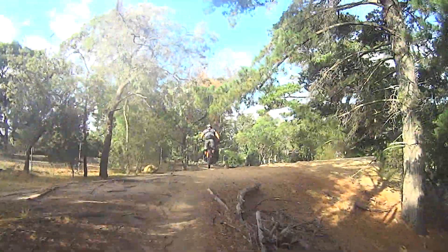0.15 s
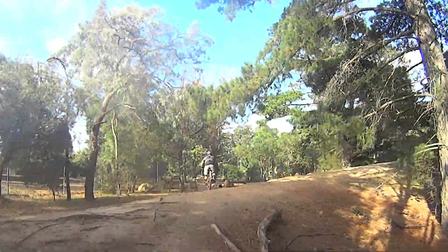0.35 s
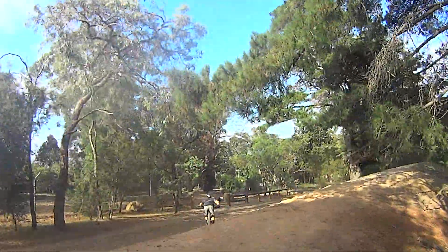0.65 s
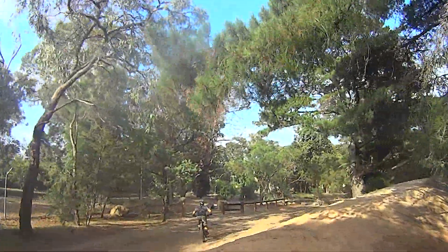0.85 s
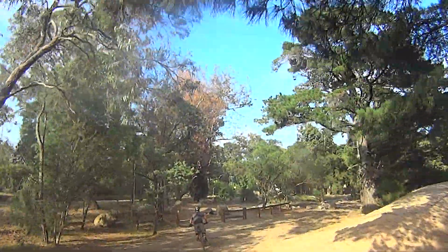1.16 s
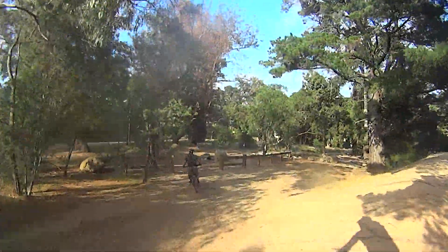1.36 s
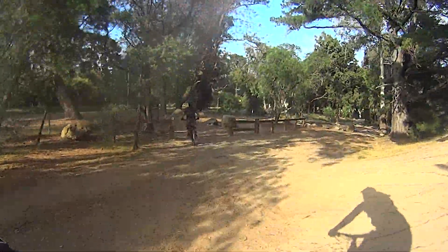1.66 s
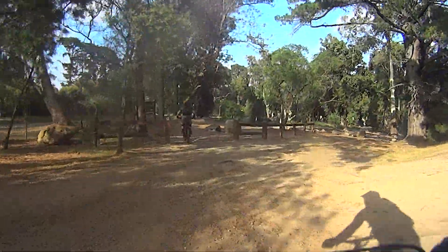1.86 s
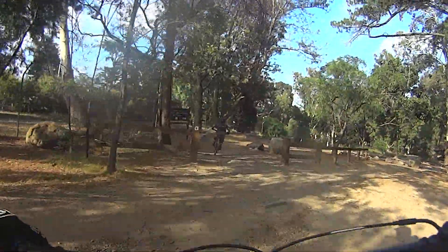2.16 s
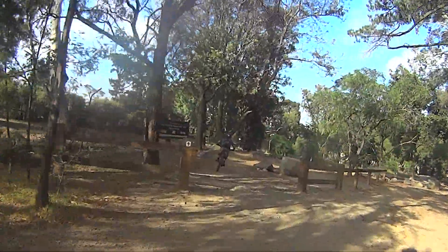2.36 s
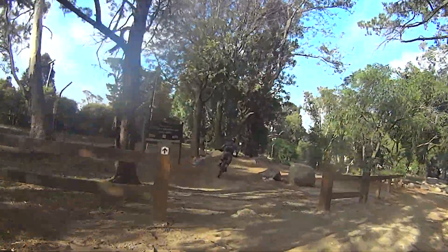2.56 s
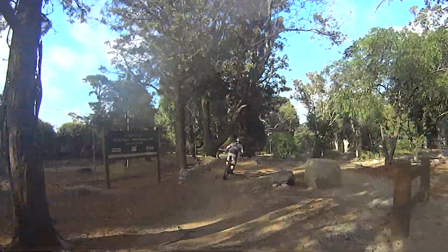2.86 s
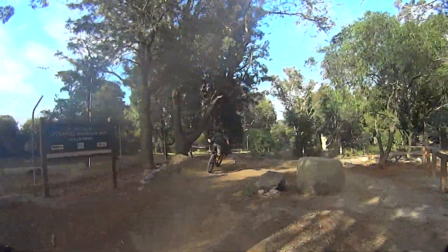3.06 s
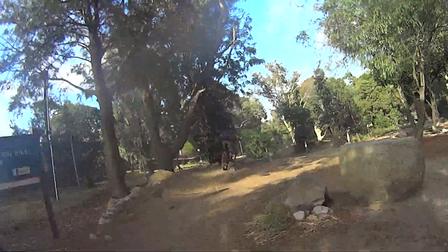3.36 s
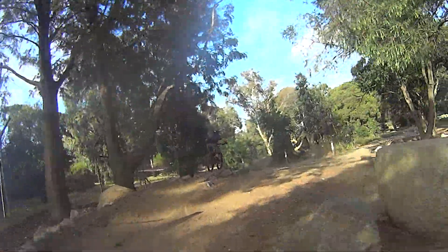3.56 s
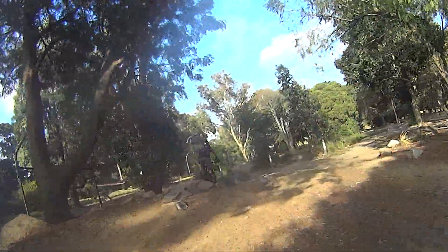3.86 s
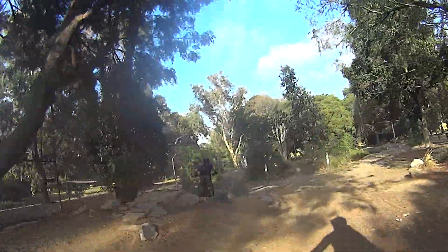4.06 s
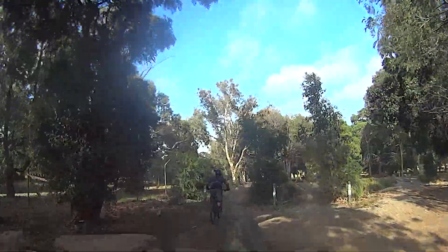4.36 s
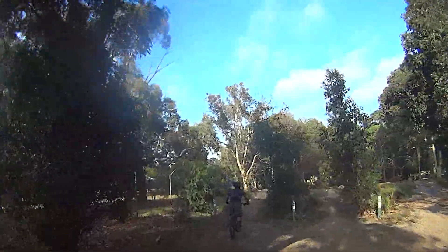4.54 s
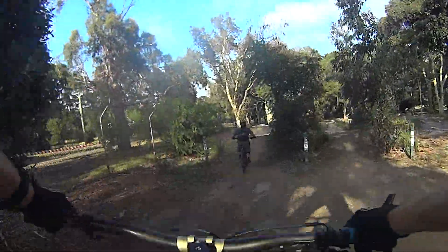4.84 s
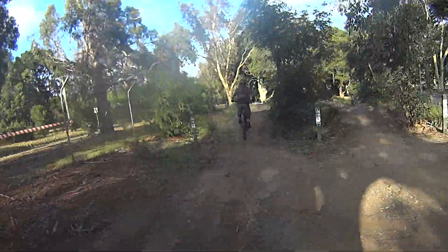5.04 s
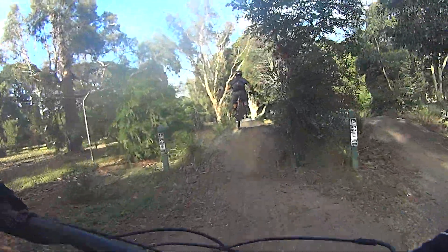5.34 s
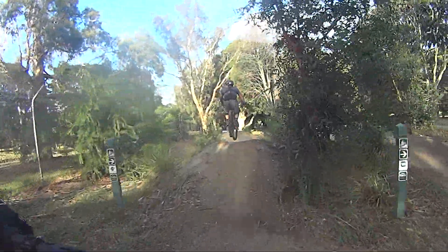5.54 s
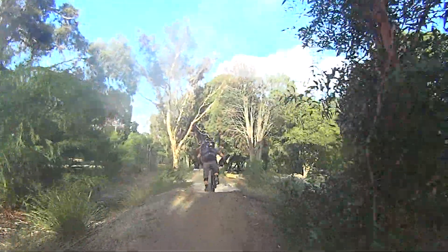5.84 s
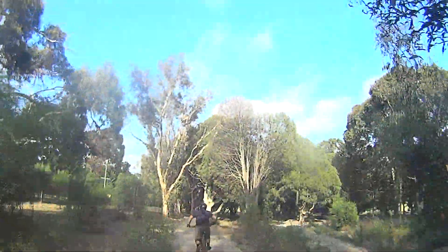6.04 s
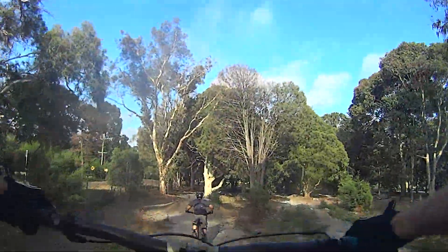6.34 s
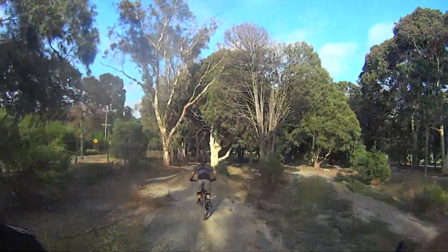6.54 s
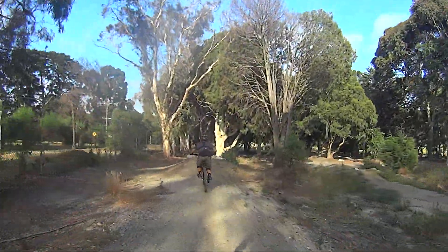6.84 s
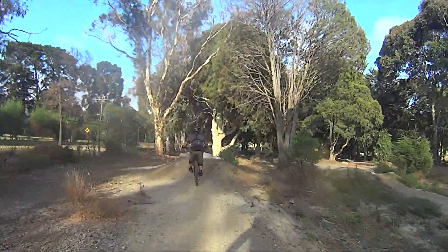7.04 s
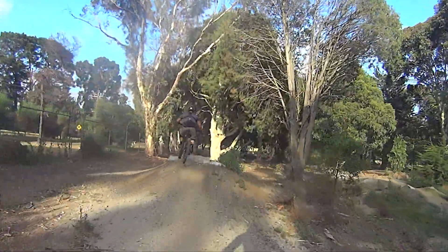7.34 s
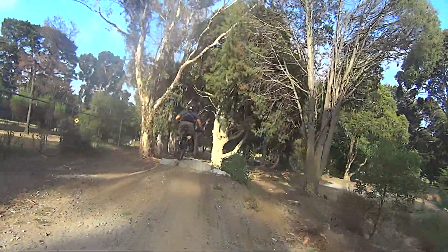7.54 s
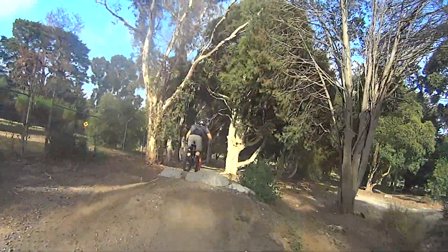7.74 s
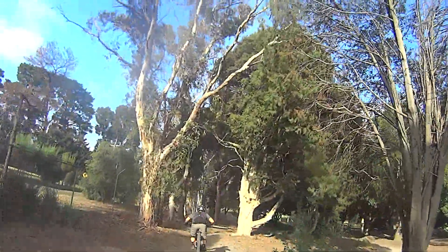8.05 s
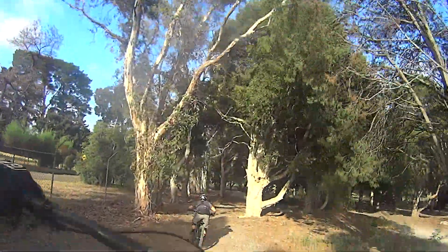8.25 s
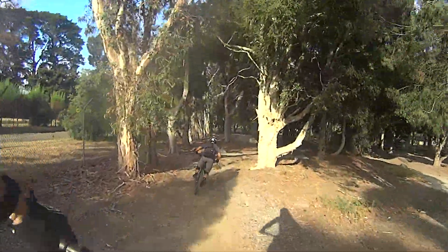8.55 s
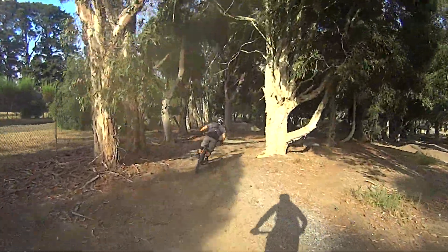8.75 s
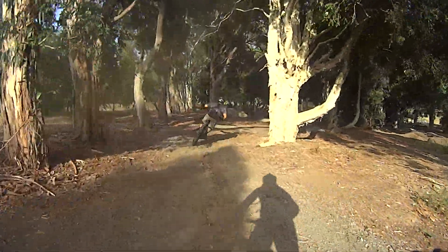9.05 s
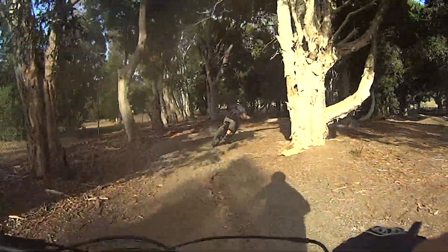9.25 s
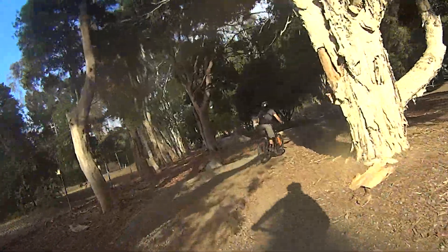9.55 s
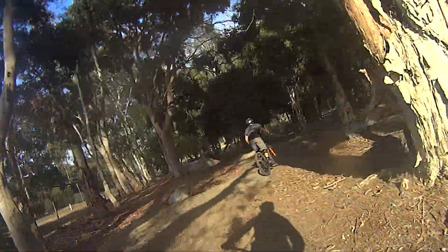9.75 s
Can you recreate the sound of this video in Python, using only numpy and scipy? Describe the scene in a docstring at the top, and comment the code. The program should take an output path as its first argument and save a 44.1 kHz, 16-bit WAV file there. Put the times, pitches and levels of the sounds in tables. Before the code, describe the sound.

A camera in a plastic case on the rider's chest hears a mountain bike coasting outdoors on dirt. Gravel crunches, tyres rumble and the hub buzzes steadily. Jumps briefly thin the sound before landings bring back the grit. A violent clanging hit comes at about three and a half seconds, with slaps and knocks around five and a dense rattle near seven.

```python
"""The tyres of a mountain bike coasting fast down a dirt trail, heard from a camera in a plastic case on the rider's chest.
They crunch and rumble as filtered random impacts, and grit sprays off them in short swells.
Chatter keeps the case resonating; bumps knock it on its mount, exciting damped modes of vibration.
Chain and cables slap in noise bursts, frame tubes clang in modes, pawl clicks ring the hub, wind buffets as low noise.
Over the jumps the tyres fall quiet, leaving a softer hub and wind."""
import sys
import numpy as np
from scipy import signal
from scipy.fft import rfft, irfft, next_fast_len
from scipy.io import wavfile
from scipy.ndimage import uniform_filter1d, map_coordinates

SR = 44100
rng = np.random.default_rng(int(sys.argv[2]) if len(sys.argv) > 2 else 0)


def master(y):
    """Save y as 16-bit WAV."""
    cut = np.clip(np.atleast_2d(y).T, -1, 1)
    pcm = np.round(cut * 32767)  # scale
    wavfile.write(sys.argv[1], SR, pcm.astype(np.int16))


N = 436590
TIME = np.arange(N) / SR   # s

# bumps that knock the camera on its mount: (time [s], relative level [dB], contact time [ms])
KNOCK_EVENTS = [(0.047, -14.5, 0.25), (0.112, -14, 0.36), (0.182, -19.5, 0.17), (.326, -15.5, 0.17),
                (0.403, -14.5, 0.34), (.459, -16.5, 0.2), (0.767, -17, 0.15), (.883, -19, 0.24),
                (0.941, -13, 0.34), (1.001, -7, 0.15), (1.091, -5.5, 1.45), (1.145, -25, 0.46),
                (1.161, -18.5, 0.5), (1.301, -19, 0.12), (1.327, -22.5, 0.15), (1.376, -24, 0.89),
                (1.441, -16, 0.089), (1.786, -18, 0.22), (1.828, -21, 0.21), (2.054, -15.5, 0.5),
                (2.645, -14.5, 0.24), (2.806, -8, 0.14), (3.052, -15.5, 0.2), (3.195, -19, 0.32),
                (3.266, -18, 0.65), (3.276, -9.5, 0.21), (3.345, -8.5, 0.19), (3.41, -10, 1.5),
                (3.418, -8, 0.44), (3.427, -9, 1.76), (3.44, -21, 0.1), (3.448, -18, 0.072),
                (3.495, -12.5, 0.48), (3.51, -8.5, 0.27), (3.948, -20, 0.17), (4.595, -20, 0.34),
                (4.624, -22.5, 0.95), (4.722, -21, 0.082), (5.047, -11.5, 0.044), (5.077, -18.5, 0.17),
                (5.102, -12.5, 0.2), (5.195, -12, 0.16), (5.226, -8.5, 0.3), (5.235, -7.5, 0.57),
                (5.316, -14, 0.22), (5.522, -23, 0.2), (6.072, -11.5, 0.24), (6.204, -19, 0.16),
                (6.799, -7.5, 0.19), (7.199, -18, 0.22), (7.305, -24.5, .35), (8.162, -22, 0.12),
                (8.22, -13.5, 0.35), (8.295, -24.5, .5), (8.325, -18.5, 0.27), (8.889, -15, 0.25),
                (8.953, -11.5, 0.34), (8.961, -8.5, 0.2), (8.965, -14, 0.25), (9.311, -16.5, 0.26),
                (9.449, -20.5, 0.42), (9.455, -10.5, 0.28), (9.535, -20, 0.12), (9.682, -18.5, 0.34)]
# sharp jolts that set the case ringing: (time [s], relative level [dB])
JOLT_EVENTS = [(1.2355, -23), (1.4402, -26), (1.7716, -23), (2.126, -14), (2.2356, -14), (2.8705, -10),
               (3.274, -19), (3.3021, -9), (3.4418, -6.5), (3.6456, -13), (3.7604, -14.5), (3.9213, -16),
               (4.658, -16), (4.831, -17), (4.895, -20), (4.934, -14.5), (5.0984, -11.5), (5.1749, -11.5),
               (5.7608, -14), (5.7905, -13), (6.757, -9), (6.7876, -10), (6.8167, -9.5), (6.877, -6.5),
               (6.898, -3.5), (6.9216, -12), (6.946, -10), (7.015, -8.5), (7.194, -15), (7.246, -10.5),
               (7.2768, -12), (7.442, -14.5), (7.661, -8), (8.7144, -19), (8.736, -14.5), (9.018, -13),
               (9.0964, -16), (9.388, -15.5)]
# spectrum of loose grit and sand: (frequency [Hz], relative level [dB])
GRIT_SPECTRUM = [(1000, 11.5), (2500, 1.5), (4000, 4.5), (5200, 6), (6500, 2.5), (8500, -2), (11000, -11)]

CASE_HZ, CASE_WIDTH_HZ, CASE_SKIRT_HZ = 1630.3, 136, 375   # resonance, its bandwidth, a wider second one


def from_db(db):
    """Amplitude gain from the logarithmic decibel scale."""
    return 10 ** (np.asarray(db) / 20)


def rms_one(x):
    """Normalise the mean power, so that the rms is 1."""
    return x / np.sqrt(np.mean(x ** 2) + 1e-20)


def in_time(rows):
    """Linear interpolation of each column of a time table at every sample."""
    seconds, *columns = np.transpose(rows)
    return [np.interp(TIME, seconds, column) for column in columns]


def at_hz(points, hz):
    """Interpolation of a spectrum along a logarithmic frequency axis."""
    frequency, value = np.transpose(points)
    return np.interp(np.log(hz + 1), np.log(frequency), value)


def pan(db):
    """Interaural level difference: left and right gains, db apart."""
    return from_db(np.array([[db], [-db]]) / 2)


def add(out, s, sound):
    """Linear superposition of a short sound from time s on."""
    start = int(np.clip(round(s * SR), 0, N - 1))
    out[..., start:start + sound.shape[-1]] += sound[..., :N - start]


def drift(rate):
    """Band-limited random fluctuation: Gaussian knots, rate per second, joined smoothly to rms 1."""
    knots = rng.standard_normal(4000)
    # every 20th sample is computed and held
    curve = map_coordinates(knots, [TIME[::20] * rate], order=2, mode="wrap")
    return rms_one(curve).repeat(20)[:N]


def resonate(x, hz, width_hz):
    """Damped resonance: a two-pole filter with gain about 1 at its peak."""
    radius = np.exp(-np.pi * width_hz / SR)
    zeros = np.array([1, 0, -1]) * (1 - radius * radius) / 2
    poles = [1, -2 * radius * np.cos(2 * np.pi * hz / SR), radius * radius]
    return signal.lfilter(zeros, poles, x + 1e-18)


def at_ports(pair, spectrum):
    """Partial coherence: two unrelated signals, coloured, mix into left and right; their middle has rms 1."""
    # likeness of the two microphone ports: (frequency [Hz], correlation [-1 to 1])
    likeness = [(60, 1), (130, 0.81), (200, 0.97), (290, -0.52), (450, 0.044), (650, -0.043), (900, -0.35),
                (1400, 0.13), (2500, 0.37), (3200, 0.27), (4000, -0.55), (5200, 0.94), (7000, 0.22),
                (11000, 0.39)]
    size = next_fast_len(N + 4096)
    hz = np.arange(size // 2 + 1) * SR / size
    alike = np.clip(at_hz(likeness, hz), -.98, .98)
    # like parts feed the middle, unlike parts the side
    balance = np.sqrt([1 + alike, 1 - alike])
    coloured = rfft(pair, size) * from_db(at_hz(spectrum, hz)) * balance
    mid, side = irfft(coloured, size)[:, :N]
    return np.array([mid + side, mid - side]) / np.std(mid)


def grains(per_s, spread_db, bed):
    """Shot noise: random cracks of unequal size over a noise bed; two rows share the instants."""
    struck = rng.random(N) < per_s / SR
    sizes = from_db(spread_db * np.minimum(rng.exponential(1, N), 4)) * struck
    cracks = rms_one(sizes * rng.standard_normal((2, N)))
    return cracks + bed * rng.standard_normal((2, N))


def steady(x, seconds):
    """Automatic gain: divide by the short-term rms, keeping the fine grain."""
    power = np.mean(np.atleast_2d(x) ** 2, axis=0)
    return x / np.sqrt(uniform_filter1d(power, int(seconds * SR)) + 1e-12)


def die_away(clicks, fade_s):
    """Exponential decay: each click falls by the factor e in fade_s."""
    return signal.lfilter([1], [1, -np.exp(-1 / (fade_s * SR))], clicks + 1e-18)


def case(force):
    """Cavity-like ring of the camera case: two cascaded resonances at one frequency."""
    return resonate(resonate(force, CASE_HZ, CASE_WIDTH_HZ), CASE_HZ, CASE_SKIRT_HZ)


def aftermath(hits, fade_s):
    """Incoherent addition: hits (time, dB, ..) leave decaying shaking, summed in power, as a gain."""
    power = np.zeros(N)
    for s, db, *_ in hits:
        add(power, s, from_db([db]) ** 2)
    # power fades twice as fast as amplitude
    return np.sqrt(die_away(power, fade_s / 2))


def shaken(level_db, shake):
    """Energy summation of a level in dB with an extra shaking gain."""
    return 20 * np.log10(np.hypot(from_db(level_db), shake))


def jumps():
    """Contact load: how far the tyres are unloaded (0-1), and the landing load in dB, which decays."""
    # jumps: (touch-down [s], time since take-off [s], time to unload tyres [s], extra load on landing [dB])
    flights = [(1.72, .47, .08, 5), (5.06, .14, 0.079, 12.5), (6.75, .62, .28, 2.5),
               (8.712, 0.56, .25, 3.5)]
    bite_s, settle_s = 0.014, 0.21   # the tyres bite into the dirt, then the suspension takes up the landing
    air, load_db = np.zeros(N), np.zeros(N)
    for touch_down, flight_s, unload_s, landing_db in flights:
        since = TIME - touch_down
        bite = np.clip(since / bite_s, 0, 1)
        air += np.clip((since + flight_s) / unload_s, 0, 1) * (1 - bite)
        load_db += landing_db * bite * np.exp(-np.maximum(since, 0) / settle_s)
    return np.clip(air, 0, 1), load_db


def ride(air, load_db):
    """Contact excitation: trail, flight, landings and bumps set the ring, crunch, rumble and drum levels."""
    # work of the tyres on the ground: (time [s], relative case ring level [dB], relative crunch level [dB])
    tyre_work = [(0.0, -33, -44.5), (0.88, -39.5, -47), (1.17, -35, -45), (1.9, -32, -41),
                 (2.05, -33.5, -42), (2.46, -26, -38), (2.8, -36.5, -43), (3.3, -32.5, -40.5),
                 (3.55, -36.5, -47), (3.75, -32, -42.5), (4.45, -34, -45.5), (4.75, -41, -46.5),
                 (5.45, -35.5, -49), (5.8, -32.5, -43), (7.05, -29.5, -40), (7.76, -35.5, -43.5),
                 (8.02, -26, -41.5), (8.25, -38.5, -38.5), (8.95, -35.5, -45.5), (9.15, -34, -40),
                 (9.45, -36, -45), (9.9, -31, -42)]
    # firmness of the trail: (time [s], relative tyre rumble level [dB], tread drumming level [dB])
    firmness = [(0.0, -39, -65), (0.7, -44.5, -51), (1.1, -39.5, -40), (1.9, -41, -41.5), (2.6, -39.5, -40),
                (3.1, -42.5, -41.5), (4.2, -44, -50.5), (5.9, -42, -50), (6.9, -45, -55), (7.4, -40.5, -48),
                (7.85, -46.5, -56), (8.15, -39, -42), (9.1, -41.5, -47.5), (9.9, -42, -56)]
    # the case is scuffed as the rider shifts in mid-air:
    # (time at its height [s], relative level [dB], half length [s])
    scuff_events = [(8.442, -32, 0.058), (8.647, -30.5, 0.02)]
    air_ring_db, air_crunch_db, air_rumble_db = -45.5, -54, -47.5   # what is left in the air
    air_drum_db = -6   # change in the air
    ring_share, rumble_share = .8, 0.17   # of the landing load; the crunch takes all of it
    # chatter after a jolt and rumble after a knock, against the level in the event's table
    jolt_ring_db, jolt_crunch_db, knock_rumble_db = -18, -33, -26.5
    scuff_rasp_db = -18   # rasp of a scuff, against its ring

    ring_db, crunch_db = in_time(tyre_work)
    rumble_db, drum_db = in_time(firmness)
    # the dirt is now looser, now firmer
    patches_db = 0.5 * drift(rate=12) * (1 - air)
    ring_db = ring_db + air * (air_ring_db - ring_db) + ring_share * load_db + patches_db
    crunch_db = crunch_db + air * (air_crunch_db - crunch_db) + load_db + patches_db
    rumble_db = rumble_db + air * (air_rumble_db - rumble_db) + rumble_share * load_db

    scuffs = sum(from_db(db) * np.exp(-((TIME - s) / half_s) ** 2) for s, db, half_s in scuff_events)
    jolted = aftermath(JOLT_EVENTS, fade_s=0.027)
    knocked = aftermath(KNOCK_EVENTS, fade_s=0.043)
    return (shaken(ring_db, from_db(jolt_ring_db) * jolted + scuffs),
            shaken(crunch_db, from_db(jolt_crunch_db) * jolted + from_db(scuff_rasp_db) * scuffs),
            shaken(rumble_db, from_db(knock_rumble_db) * knocked),
            drum_db + air_drum_db * air)


def wind(wind_db):
    """Wind pressure fluctuation: lumpy low-frequency noise on the case; besides it, a faint even hiss runs
    under the whole scene."""
    # spectrum of the buffeting: (frequency [Hz], relative level [dB])
    buffet_spectrum = [(12, -9), (26, 5), (45, -4.5), (70, -9.5), (110, -20), (250, -46), (800, -85)]
    # spectrum of the hiss: (frequency [Hz], relative level [dB])
    hiss_spectrum = [(300, -21), (1000, -0.5), (5000, 4), (7500, -2.5), (11000, -6.5)]
    lumps = at_ports(rng.standard_normal((2, N)), buffet_spectrum)
    buffet = steady(lumps, seconds=0.31) * from_db(wind_db)
    hiss = from_db(-54.5) * at_ports(rng.standard_normal((2, N)), hiss_spectrum)
    return buffet + hiss


def freewheel(air):
    """Ratchet impacts: pawls drop over teeth at a rate set by the wheel and excite the hub shell's resonances."""
    # freewheel, following the wheel's speed on the ground: (time [s], mean pawl click rate [1/s])
    click_rate = [(0, 80), (.5, 67), (.85, 63), (1.15, 84), (4.5, 67.6), (5.4, 68), (6.2, 68.6),
                  (9.9, 84.4)]
    slowing = .2   # share of its speed that the wheel loses in the air
    per_s = in_time(click_rate)[0] * (1 - slowing * air)
    teeth = np.floor(np.cumsum(per_s * (1 + 0.028 * drift(rate=40))) / SR)
    clicks = np.diff(teeth, prepend=0) * from_db(2 * rng.standard_normal(N))
    # each pawl chatters briefly as it lands
    chatter = die_away(clicks, fade_s=.0018) * rng.standard_normal((2, N))
    shell = resonate(resonate(chatter, 4960, 660), 5500, 1500)
    # half of each channel crosses into the other
    buzz = from_db(-55.5) * rms_one(shell + .5 * shell[::-1])
    # the buzz also travels through the frame into the camera case
    through_frame = from_db(-49.5) * rms_one(case(chatter[0]))
    return buzz + through_frame


def frame_clangs():
    """Modal vibration: the hardest hits ring the frame's tubes as decaying sines."""
    # the suspension bottoms out: (time [s], peak level [dB])
    bottoming = [(1.44, -22), (3.421, -7), (3.439, -7.5), (3.448, -10), (5.1, -35)]
    # modes of the frame: (frequency [Hz], relative level [dB], 60 dB decay time [s])
    frame_modes = [(696, -5.5, 0.039), (864, -6, 0.049), (1086, -4.5, 0.048), (1380, 8, 0.029)]
    t, out = TIME[:SR // 8], np.zeros((2, N))
    chance = rng.standard_normal((len(bottoming), len(frame_modes), 2, 1))
    for (s, db), draws in zip(bottoming, chance):
        clang = np.zeros((2, len(t)))
        for (hz, mode_db, t60), luck in zip(frame_modes, draws):
            clang += from_db(mode_db + 2 * luck - 60 * t / t60) * np.sin(2 * np.pi * hz * t)
        add(out, s, clang / np.abs(clang).max() * from_db(db))
    return out


def chain_slaps():
    """Impact noise: each slap is a coloured noise burst with a fast onset and exponential decay."""
    # chain and cables slap the frame: (time [s], relative level [dB], 60 dB decay time [s])
    slap_events = [(1.275, -27.5, 0.028), (1.4395, -19.5, 0.0077), (3.42, -13.5, 0.011),
                   (3.425, -13, 0.011), (3.439, -17.5, 0.024), (3.445, -26, 0.023), (4.6013, -16.5, 0.021),
                   (4.609, -22, 0.021), (4.833, -27, 0.048), (4.896, -29.5, 0.036), (4.932, -26, 0.032),
                   (5.048, -30.5, 0.033), (5.1, -21, .05), (5.174, -24.5, 0.039), (5.185, -20, 0.025),
                   (7.276, -24.5, .02), (8.718, -26.5, 0.038), (8.75, -27, .02)]
    # spectrum of a slap: (frequency [Hz], relative level [dB])
    slap_spectrum = [(300, 11), (1000, -0.5), (1650, 11.5), (2200, 6), (3200, 3.5), (4000, -1), (5100, 3.5),
                     (6000, -12.5), (11000, -23)]
    t, burst = TIME[:SR // 8], np.zeros(N)
    for s, db, t60 in slap_events:
        onset = 1 - np.exp(-t / 0.00018)
        add(burst, s, from_db(db + 0.5 - 60 * t / t60) * onset)
    return burst * at_ports(rng.standard_normal((2, N)), slap_spectrum)


def knocks(lead_s=0.003547, lead_share=0.48, rebound_share=0.36, low_cut_hz=95, scatter_db=1.3):
    """Impulse response of a mount: contact forces excite its modes; longer contacts favour the low ones."""
    # modes of the camera on its mount:
    # (mean frequency [Hz], 60 dB decay time [s], mean level [dB], mean left-right difference [dB], left lag [ms])
    mount_modes = [(109, 0.0071, -27, 19, 1), (206, 0.036, -3.5, -1.5, 0.81), (296.4, 0.031, 5, -3.5, 0.93),
                   (500, 0.034, 0.5, 4.5, 0.75), (855, 0.023, -3, 9, 0.41), (1050, 0.015, -2, 11.5, 0.29),
                   (1810, 0.036, -15, -7, 0.24)]
    t, out = TIME[:SR // 12], np.zeros((2, N))
    hit_s = .008   # the main contact within the snippet
    low_cut = signal.butter(1, low_cut_hz, "high", fs=SR, output="sos")
    chance = rng.standard_normal((len(KNOCK_EVENTS), len(mount_modes) + 1, 3))
    for (s, db, contact_ms), draws in zip(KNOCK_EVENTS, chance):
        early, late, hard = draws[-1]
        # the camera hits its stop, with a lighter contact before and a rebound of chance strength and sign
        contacts = [(0, 1),
                    (-lead_s * from_db(2 * early), lead_share),
                    (lead_s * from_db(3.37 * late), rebound_share * hard)]
        width_s = contact_ms * 1e-3
        force = sum(size * np.exp(-.5 * ((t - hit_s - when) / width_s) ** 2) for when, size in contacts)
        body = np.zeros((2, len(t)))
        for (hz, t60, mode_db, side_db, lag_ms), (strength, detune, lean) in zip(mount_modes, draws):
            # the two ports move out of step
            age = np.maximum(t - np.array([[lag_ms], [0]]) * 1e-3, 0)
            pitch = hz * (1 + .06 * detune)
            gain = from_db(mode_db + scatter_db * strength - 60 * age / t60)
            body += pan(side_db + scatter_db * lean) * gain * np.sin(2 * np.pi * pitch * age)
        knock = signal.fftconvolve(body, force[None], axes=1)[:, :len(t)]
        # the lowest frequencies are taken out of each knock
        knock = signal.sosfilt(low_cut, knock)
        add(out, s - hit_s - .0012, knock / np.abs(knock).max() * from_db(db + 1.9))
    return out


def grit_sprays(flicks_per_s=14, flick_db=-55, flick_fade_s=0.0056):
    """Amplitude-modulated shot noise: grit rattles off the knobs in swells, single stones flick up at random."""
    # the tyres throw a spray of grit: (time at its height [s], relative level [dB], rise time [s])
    spray_events = [(0.59, -45, 0.004), (0.642, -48, 0.0071), (1.074, -43, 0.0026), (1.229, -45, 0.011),
                    (1.784, -38.5, 0.013), (1.848, -50, 0.017), (1.913, -44.5, 0.011), (1.967, -37, 0.0038),
                    (2.292, -44.5, 0.0052), (2.504, -44, 0.0049), (2.579, -42.5, 0.0041),
                    (2.665, -44.5, 0.0089), (3.357, -49.5, 0.04), (4.09, -49, 0.0069), (5.118, -37, 0.014),
                    (5.182, -41, 0.022), (5.285, -42.5, 0.0055), (5.991, -45.5, 0.0067),
                    (6.865, -47.5, 0.009), (7.214, -48, 0.0058), (7.264, -52, 0.0073),
                    (8.064, -43.5, 0.005), (8.654, -47.5, 0.0039), (8.752, -49, 0.025)]
    swell = np.zeros(N)
    for s, db, rise_s in spray_events:
        t = np.arange(0, 8 * rise_s, 1 / SR) / rise_s
        add(swell, s - rise_s, from_db(db + 6.5) * t * np.exp(1 - t))
    flicks = (rng.random(N) < flicks_per_s / SR) * from_db(flick_db + 5.0 * rng.standard_normal(N))
    swell += die_away(flicks, flick_fade_s)
    return swell * at_ports(grains(per_s=1100, spread_db=2.0, bed=0.73), GRIT_SPECTRUM)


def case_rattle(ring_db, roughness, rise_s=0.0017, fade_s=0.0037):
    """Forced and free vibration: chatter drives the case without pause, jolts make single decaying pings."""
    common, uneven = case(grains(per_s=320, spread_db=2.0, bed=1.26) * roughness)
    ports = common + from_db(-18) * uneven * [[1], [-1]]
    chatter = steady(ports, seconds=0.07) * from_db(ring_db + 0.05)
    # a ping swells over a few cycles and rings down
    t, pings = TIME[:SR // 25], np.zeros(N)
    shape = (1 - np.exp(-t / rise_s)) ** 2 * np.exp(-t / fade_s)
    shape = shape / shape.max()
    for (s, db), detune in zip(JOLT_EVENTS, rng.standard_normal(len(JOLT_EVENTS))):
        tone = np.sin(2 * np.pi * CASE_HZ * (1 + 0.026 * detune) * t)
        add(pings, s - .0005, from_db(db - 4.0) * shape * tone)
    return (chatter + pings) * pan(db=3.5)


def tyres(crunch_db, rumble_db, drum_db, roughness, snaps_per_s=45, snap_size=1.03, snap_fade_s=0.0042):
    """Random-impact excitation: knobs crush gravel in snaps, sand hisses, the casings rumble and drum."""
    # spectrum of crushed gravel: (frequency [Hz], relative level [dB])
    crunch_spectrum = [(900, -32), (1400, -23), (1900, -5.5), (2250, 2), (2700, -1.5), (3220, 6),
                       (3500, -3), (4000, -14), (4500, -8.5), (4900, -16.5), (5200, -4.5), (5700, -38),
                       (7000, -21), (11000, -33)]
    # spectrum of the rolling casings: (frequency [Hz], relative level [dB])
    rumble_spectrum = [(40, -43), (75, -9), (130, -2), (200, -0.5), (280, 1), (400, -2.5), (550, -8),
                       (680, -6), (850, -12), (1200, -12), (1900, -26), (3000, -45)]
    snaps = (rng.random(N) < snaps_per_s / SR) * snap_size * from_db(5.1 * rng.standard_normal(N))
    gravel = grains(per_s=2500, spread_db=2, bed=1) * roughness * (1 + die_away(snaps, snap_fade_s))
    crunch = steady(at_ports(gravel, crunch_spectrum), seconds=0.18) * from_db(crunch_db + 1)
    sand = at_ports(rng.standard_normal((2, N)), GRIT_SPECTRUM) * from_db(crunch_db - 15)
    rolling = at_ports(grains(per_s=600, spread_db=2.5, bed=1.0), rumble_spectrum)
    rumble = steady(rolling, seconds=0.14) * from_db(rumble_db + 4.5)
    tread = resonate(resonate(rng.standard_normal(N), hz=73, width_hz=26), hz=74.0, width_hz=28)
    drum = steady(tread, seconds=0.23) * from_db(drum_db)
    return crunch * pan(db=2.5) + sand * pan(db=-6.5) + rumble * pan(db=0.3) + drum


def scene():
    """Near-field superposition: everything rides with the camera, so the sound is close and dry."""
    # strength of the buffeting on the ground, before landing loads: (time [s], level [dB])
    gusts = [(0.0, -35), (0.77, -30.5), (0.82, -49), (1.13, -34.5), (1.68, -44), (1.82, -33), (2.23, -44),
             (3.42, -31), (4.3, -49.5), (4.57, -30), (5.02, -45), (5.1, -28.5), (5.6, -43), (8.74, -37.5),
             (8.96, -26.5), (9.21, -53), (9.32, -33.5), (9.9, -43)]
    air_hub_db, air_wind_db = -4.5, -5   # change in the air
    landing_wind_share = 0.64   # of the landing load
    air, load_db = jumps()
    ring_db, crunch_db, rumble_db, drum_db = ride(air, load_db)
    wind_db = in_time(gusts)[0] + air_wind_db * air + landing_wind_share * load_db
    # the same rough patches drive the crunch and the case
    roughness = from_db(0.55 * drift(rate=30) + 1.06 * drift(rate=120))
    ground = tyres(crunch_db, rumble_db, drum_db, roughness) + grit_sprays()
    bike = freewheel(air) * from_db(air_hub_db * air) + chain_slaps() + frame_clangs()
    camera = case_rattle(ring_db, roughness) + knocks()
    return ground + bike + camera + wind(wind_db)


def record(dry):
    """Overload and band limit: peaks clip at full scale, then a steep low-pass cuts the top."""
    clipped = np.clip(dry, -1, 1)
    low_pass = signal.ellip(10, .2, 70, 11050, fs=SR, output="sos")   # ripple and stop band [dB], cutoff [Hz]
    return signal.sosfilt(low_pass, clipped)


dry = scene()
out = record(dry)
master(out)
```